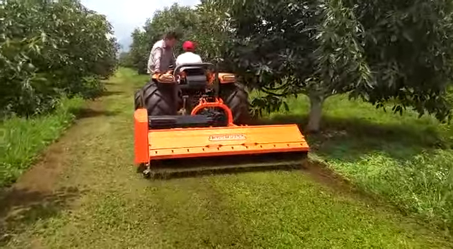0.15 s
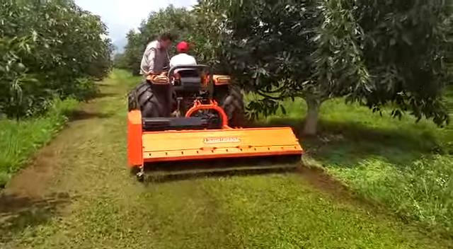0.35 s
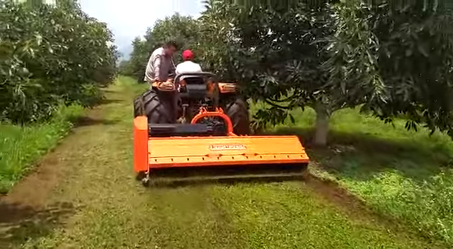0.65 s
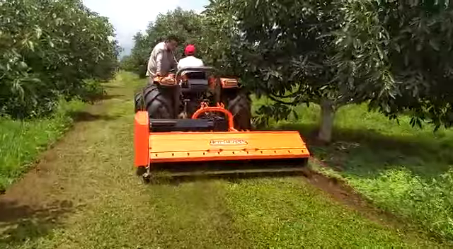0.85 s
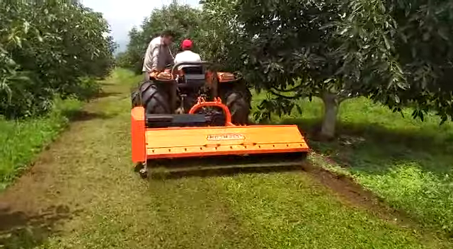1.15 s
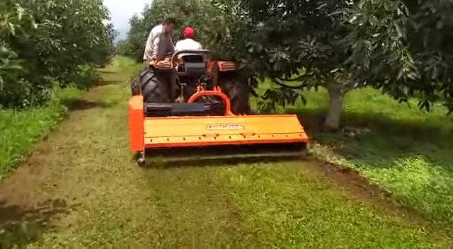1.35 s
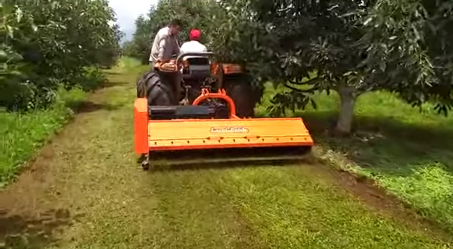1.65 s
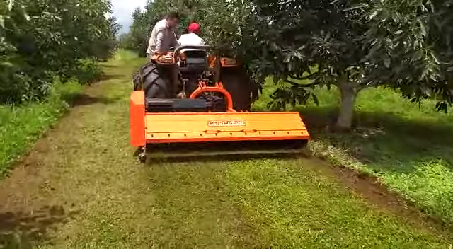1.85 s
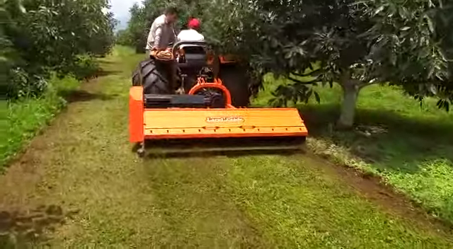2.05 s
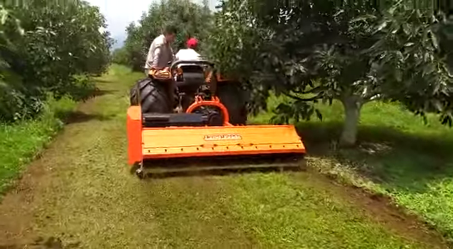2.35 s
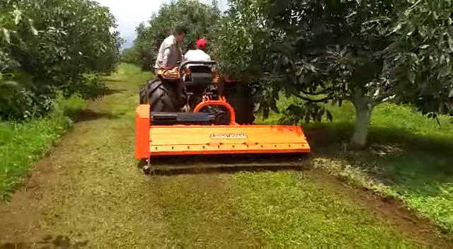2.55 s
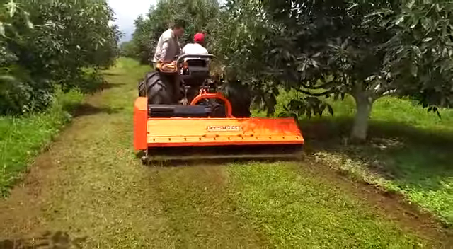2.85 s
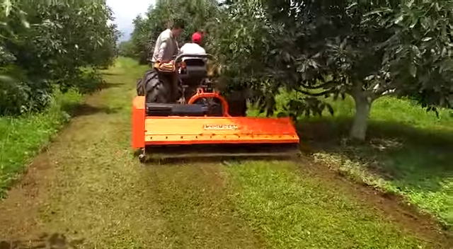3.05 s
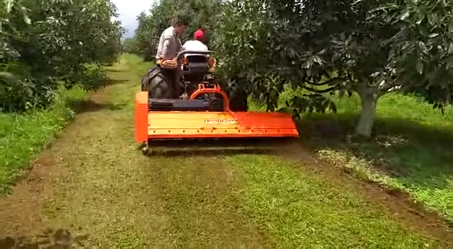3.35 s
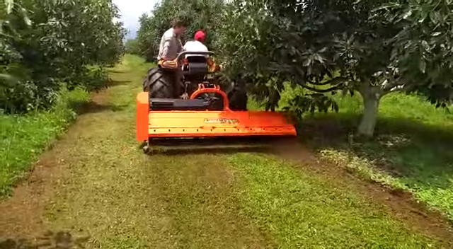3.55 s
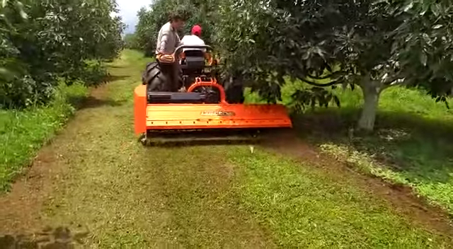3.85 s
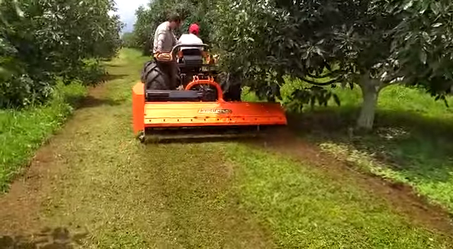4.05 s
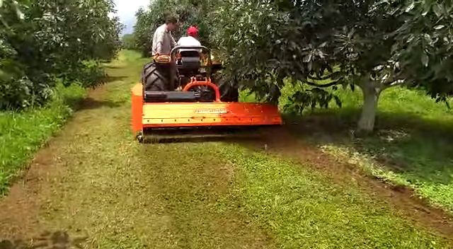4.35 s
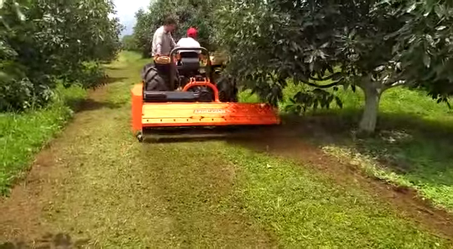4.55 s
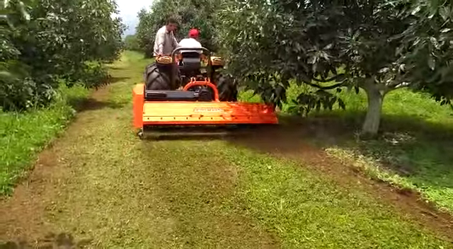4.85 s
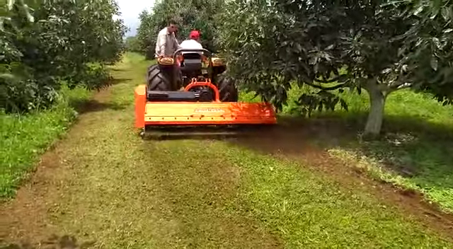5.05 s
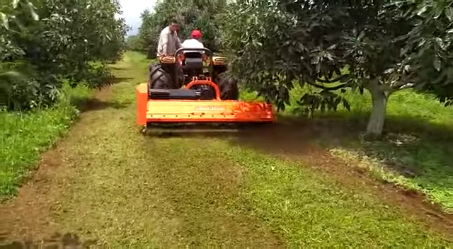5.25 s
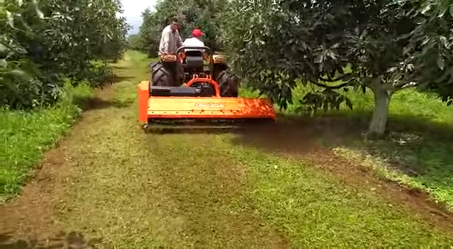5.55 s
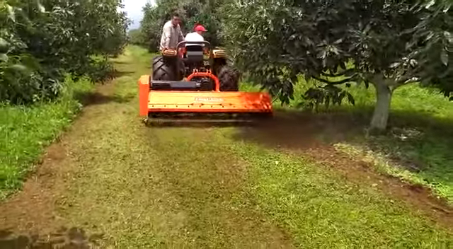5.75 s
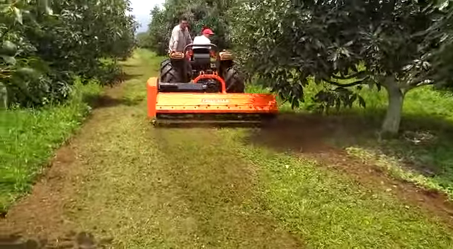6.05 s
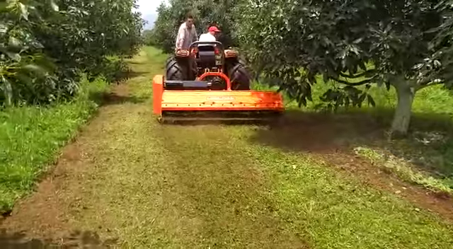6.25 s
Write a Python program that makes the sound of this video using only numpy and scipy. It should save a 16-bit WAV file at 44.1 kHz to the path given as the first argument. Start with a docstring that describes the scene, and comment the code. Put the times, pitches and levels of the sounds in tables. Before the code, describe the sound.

A spinning mower hums and shreds grass over a running diesel tractor, with stones and sticks clicking against its steel hood.

```python
"""Flail mower in an orchard

A diesel tractor pulls a mower through the grass, swells close, then slowly draws away.
Four rows of flails drone like a siren under the steel hood, shred stalks and fling the odd
stone or stick at it. Exhaust, clatter and gear whine run underneath, geared to the rotor.
The drone pushes a fast limiter."""
import sys
import numpy as np
from scipy import signal
from scipy.fft import rfft, irfft, next_fast_len
from scipy.io import wavfile
from scipy.ndimage import uniform_filter1d, minimum_filter1d

SR = 44100
rng = np.random.default_rng(int(sys.argv[2]) if len(sys.argv) > 2 else 0)


def int16_out(signal):
    """Quantize to a 16-bit WAV file."""
    q = np.round(np.clip(np.atleast_2d(signal).T, -1, 1) * 32767)
    wavfile.write(sys.argv[1], SR, q.astype(np.int16))


N = 282681


def undb(db):
    """Decibels to gain."""
    return 10 ** (np.asarray(db) / 20)


def unit(x):
    """Scale to rms 1."""
    return x / np.sqrt(np.mean(x ** 2))


def curve(table):
    """Automation line through (time_s, value) points."""
    return np.interp(np.arange(N) / SR, *np.transpose(table))


def wander(rate_hz):
    """Smooth random drift, rms 1."""
    step = int(SR / rate_hz)
    stairs = np.repeat(rng.standard_normal(N // step + 1), step)
    return unit(uniform_filter1d(uniform_filter1d(stairs, step), step)[:N])


def colour(x, points):
    """Minimum-phase EQ through (freq_hz, gain_db) points."""
    size = next_fast_len(N + SR // 2, True) // 2 * 2
    hz, db = np.transpose(points)
    bin_hz = np.arange(size // 2 + 1) * SR / size
    gain = undb(np.interp(np.log(bin_hz + 1), np.log(hz), db))
    cepstrum = irfft(np.log(gain))
    cepstrum[1:size // 2] *= 2
    cepstrum[size // 2 + 1:] = 0
    return irfft(rfft(x, size) * np.exp(rfft(cepstrum)))[:N]


def partials(turns, table, flutter, flutter_hz):
    """Harmonics of a rotation, each fluttering in strength and phase."""
    out = 0
    for harmonic, level_db in table:
        sway = 1 + flutter * (wander(flutter_hz) + 1j * wander(flutter_hz))
        tone = np.exp(2j * np.pi * (harmonic * turns + rng.random()))
        out += undb(level_db) * unit(np.real(sway * tone))
    return out


def clicks(per_second, spread_db):
    """Dense random impacts of unequal size."""
    hit = rng.random(N) < per_second / SR
    size = undb(spread_db * np.minimum(rng.standard_exponential(N), 5))
    return unit(hit * size * rng.choice([-1, 1], N))


# Upper edge of the drone: harmonic of the row rate, level_db against the third
DRONE_OVERTONES = [(3, 0), (4, -3.5), (5, -12), (6, -20)]
# Hum of unequal flail rows: harmonic of the shaft rate, level_db
SHAFT_HUM = [(1, -61), (2, -38.5), (3, -32.5), (5, -42), (6, -41)]
FLAIL_ROWS = 4


def rotor(rows, t):
    """Each flail row pushes air past the hood's lip; the drone fades late, its overtones creep up."""
    # the push is sharper than the suction between rows
    drone = unit(np.cos(2 * np.pi * rows) + undb(-19.5) * np.cos(4 * np.pi * rows))
    drone_db = -7.5 - 1.6 * np.maximum(t - 4.77, 0)
    overtones = partials(rows, DRONE_OVERTONES, flutter=0.055, flutter_hz=16)
    hum = partials(rows / FLAIL_ROWS, SHAFT_HUM, flutter=0.18, flutter_hz=5)
    return drone * undb(drone_db) + overtones * undb(-34.3 + 1.17 * t) + hum


# Tone of the churned air, engine rumble included: freq_hz, gain_db
AIR_EQ = [(20, -14), (45, -15.5), (72, -0.5), (130, 0.5), (240, -2.5), (340, -9), (440, -10.5), (530, -6.5),
          (720, -13.5), (950, -13.5), (1500, -19), (1750, -20), (4000, -18), (12000, -42.5)]
# Fader ride on the rush: time_s, level_db
AIR_RIDE = [(0, -21.5), (1.5, -19), (2.2, -21), (3.3, -21.5), (3.9, -22), (5.2, -21.2), (6.41, -20)]


def air():
    """Turbulence churned under the hood: a low, wavering rush."""
    rush = unit(colour(rng.standard_normal(N), AIR_EQ))
    return rush * undb(curve(AIR_RIDE) + 0.77 * wander(18))


# Ring of the sheet-steel hood: freq_hz, gain_db
HOOD_EQ = [(500, -31), (1450, -15), (1750, -23), (2200, -13), (2540, -5), (2900, -8), (3750, 1), (4500, -3),
           (5300, -4.5), (6600, -13), (7600, -16), (9500, -21.5), (15000, -23)]
# Sizzle of snapping grass blades: freq_hz, gain_db
SPRAY_EQ = [(2000, -17), (5000, -6), (6600, -8), (7700, -1.5), (9300, -5.5), (11000, -0.5), (13200, 1.5),
            (14400, 1.5), (15500, -5.5)]
# Fader ride on stalks pelting the hood: time_s, level_db
STALK_RIDE = [(0, -22), (1.5, -22.5), (2.85, -23), (3.15, -20), (3.95, -22), (4.35, -19), (5.1, -19.5),
              (5.8, -21.5), (6.41, -19.5)]
# Grass intake, easing the spray in thin patches: time_s, level_db
GRASS_RIDE = [(0, -3.5), (0.35, -2), (0.9, -6.8), (1.4, -2.5), (2.4, -2.5), (3.1, 0.5), (4.4, 1.3),
              (5.4, -0.1), (5.8, -3), (6.41, 1.5)]


def shredding(rows):
    """Grass arrives in tufts; every flail row snaps some and throws the pieces at the hood."""
    # a tuft is bitten off at once and clears within milliseconds
    clear_s = 0.0079
    bites = np.abs(clicks(150, spread_db=-0.5))
    bites = signal.lfilter([1], [1, -np.exp(-1 / (clear_s * SR))], bites)
    tufts = unit(bites - bites.mean()) + 0.41 * wander(40)
    # the cut pulses with every row, and one side of the rotor bites deeper
    sweep = np.cos(2 * np.pi * (rows - 0.08)) + 0.28 * np.cos(2 * np.pi * rows / FLAIL_ROWS)
    stalks = clicks(6500, spread_db=2.0) * undb(1.03 * tufts + 0.53 * wander(160) + 0.32 * sweep)
    spray = clicks(12000, spread_db=3.5) * undb(0.97 * tufts + 0.91 * wander(160) + 1.95 * sweep)
    patter = unit(colour(stalks, HOOD_EQ)) * undb(curve(STALK_RIDE))
    sizzle = unit(colour(spray, SPRAY_EQ)) * undb(curve(GRASS_RIDE) - 21.5)
    return patter + sizzle


# Exhaust note: harmonic of the firing rate, level_db
EXHAUST_NOTE = [(1, -25.5), (2, -33.5), (14, -48)]


def exhaust(firings):
    """Firing pulses leave the pipe as a low hum."""
    return partials(firings, EXHAUST_NOTE, flutter=0.15, flutter_hz=6)


# Resonances of the engine block: pitch_hz, width_hz, level_db
BLOCK_MODES = [(1050, 93, -44), (1594, 87, -38), (1940, 150, -40.5), (2490, 52, -43.5)]


def clatter(firings):
    """Each diesel firing kicks up a burst of noise that rings the block."""
    knock = rng.standard_normal(N) * (0.66 + np.exp(-(firings % 1) / 0.13))
    out = np.zeros(N)
    for pitch_hz, width_hz, level_db in BLOCK_MODES:
        mode = signal.iirpeak(pitch_hz, pitch_hz / width_hz, fs=SR)
        out += undb(level_db) * unit(signal.lfilter(*mode, knock))
    return out


# Gearbox whine: harmonic of the tooth rate, level_db
GEAR_WHINE = [(2, -50), (3, -48), (5, -41), (6, -43.5), (7, -50.5), (8, -42.5)]
TEETH_PER_ROW, PINION_TEETH_PER_ROW = 1.9675, 17.56


def gearbox(rows):
    """Meshing teeth whine, with one thin tone from a faster pinion on top."""
    gears = partials(rows * TEETH_PER_ROW, GEAR_WHINE, flutter=0.4, flutter_hz=14)
    pinion = partials(rows * PINION_TEETH_PER_ROW, [(1, -44)], flutter=0.4, flutter_hz=16)
    return gears + pinion


# Woody knock of a stick on the hood: freq_hz, gain_db
WOOD_EQ = [(200, -25), (700, -8), (1300, -4), (2500, -10), (6000, -34)]
# Stone and stick hits, crack and body set against the ring:
# start_s, level_db, crack_db, body_db, decay_s
DEBRIS_HITS = [(0.314, -12.5, -16, -25, 0.0046), (0.482, -12, -11, -4, 0.0083),
               (0.499, -15.5, -15, -9, .012), (1.116, -12, -7, -20, 0.0095), (1.5476, -14, -4, -15, .0048),
               (2.273, -6.5, -9, -25, 0.011), (2.465, -15, -10, -25, .005), (3.069, -9.5, -5, -11, .007),
               (3.432, -15, -2, -23, .0076), (3.767, -17, -16, -7, 0.014), (4.236, -14, -1, -12, 0.011),
               (5.077, -13, -20, -8, 0.0062), (6.079, -11.5, -2, -19, 0.014), (6.348, -22.5, 6, -21, 0.013)]


def strikes(t):
    """A stone or stick rattles between flails and hood for a few milliseconds."""
    # a hard contact rings mostly the hood's upper resonances
    low_cut = signal.butter(2, 3500, "high", fs=SR, output="sos")
    ring = unit(signal.sosfilt(low_cut, colour(rng.standard_normal(N), HOOD_EQ)))
    crack = unit(colour(rng.standard_normal(N), SPRAY_EQ))
    body = unit(colour(rng.standard_normal(N), WOOD_EQ))
    out = np.zeros(N)
    for start_s, level_db, crack_db, body_db, decay_s in DEBRIS_HITS:
        age = np.clip((t - start_s) / decay_s, 0, 10)
        burst = undb(level_db) * (age > 0) * np.exp(-age ** 2)
        out += burst * (ring + crack * undb(crack_db) + body * undb(body_db))
    return out


# Rate of passing flail rows, hunting slightly under load: time_s, pitch_hz
ROW_RATE = [(0, 157.35), (0.7, 156.9), (1.9, 157.78), (3, 157.19), (3.75, 156.67), (4.55, 157.4),
            (5.4, 156.84), (6.41, 158.02)]
# Nearness of the whole rig: time_s, level_db
NEARNESS = [(0, 1), (1.6, 1), (2.4, 4.5), (4, 0.5), (5.4, -0.5), (6.41, -1.5)]
FIRINGS_PER_ROW = 0.5464


def scene():
    """Mower and tractor locked to one rotor speed, heard in mono from behind."""
    t = np.arange(N) / SR
    rows = np.cumsum(curve(ROW_RATE)) / SR  # flail rows passed so far
    firings = rows * FIRINGS_PER_ROW
    mower = rotor(rows, t) + air() + shredding(rows) + strikes(t)
    # clatter and whine sink as the tractor moves under the trees
    under_trees = undb(2.3 - 0.84 * t)
    tractor = exhaust(firings) + (clatter(firings) + gearbox(rows)) * under_trees
    return ((mower + tractor) * undb(curve(NEARNESS)))[None]


def record(dry, ceiling=0.76, hold_s=0.0051, sense_s=0.0002):
    """A fast limiter holds the drone, so its beat with the exhaust throbs in the hiss."""
    hold = int(hold_s * SR)
    level = uniform_filter1d(np.abs(dry), int(sense_s * SR))
    gain = np.minimum(1, ceiling / (level + 1e-9))
    gain = uniform_filter1d(minimum_filter1d(gain, hold), hold)
    low_cut = signal.butter(2, 36, "high", fs=SR, output="sos")
    high_cut = signal.ellip(10, 0.05, 60, 15480, fs=SR, output="sos")
    held = signal.sosfilt(low_cut, dry * gain)
    clipped = np.clip(held, -0.88, 0.88)  # sharp cracks slip past the limiter
    return signal.sosfiltfilt(high_cut, clipped)


dry = scene()
out = record(dry)
int16_out(out)
```